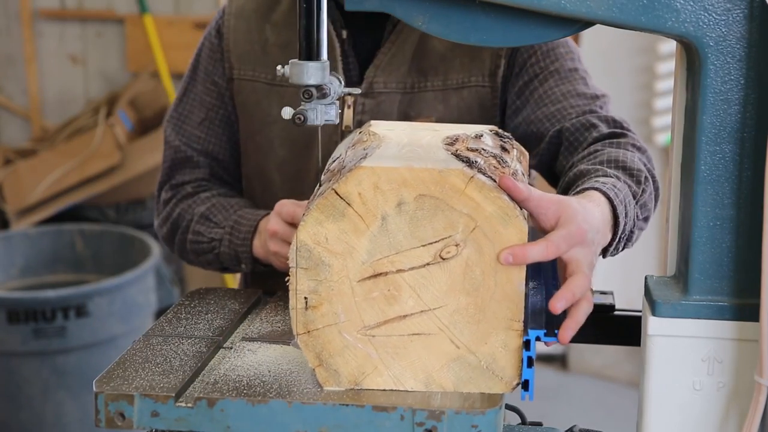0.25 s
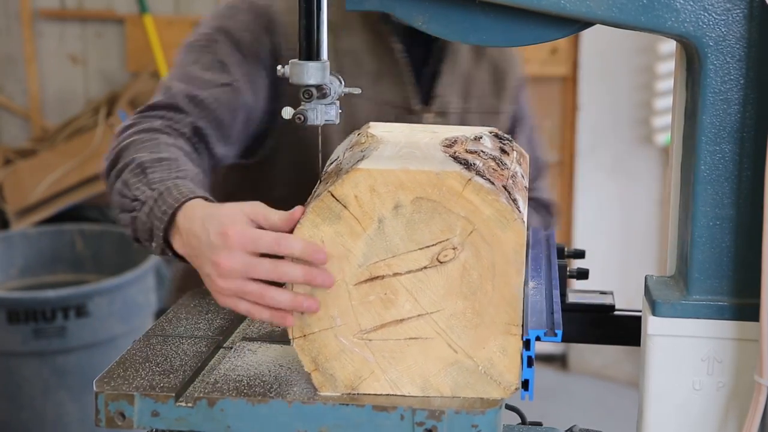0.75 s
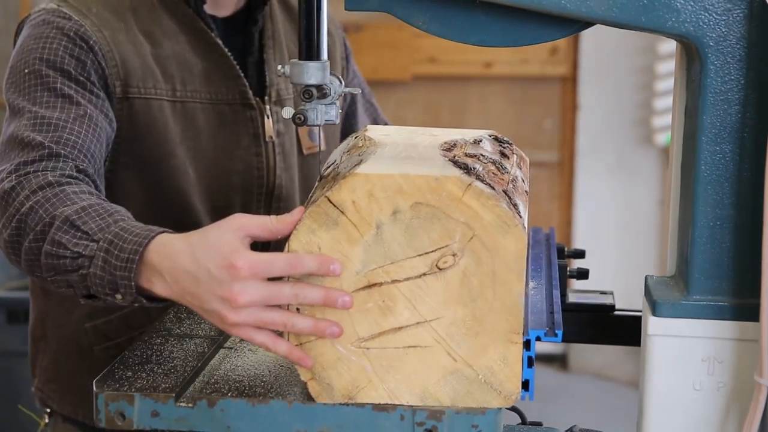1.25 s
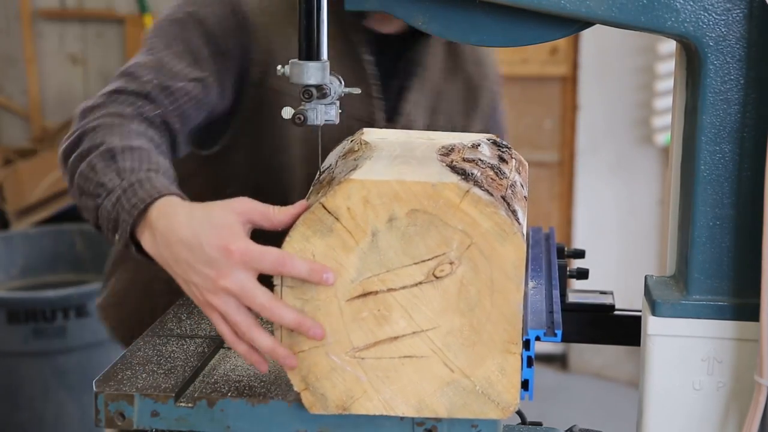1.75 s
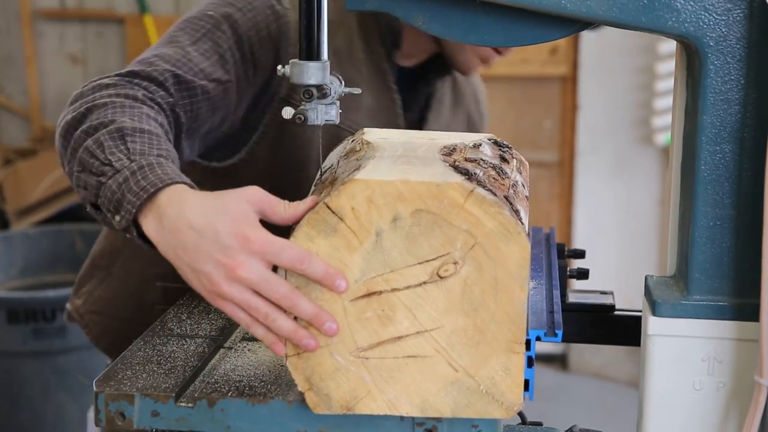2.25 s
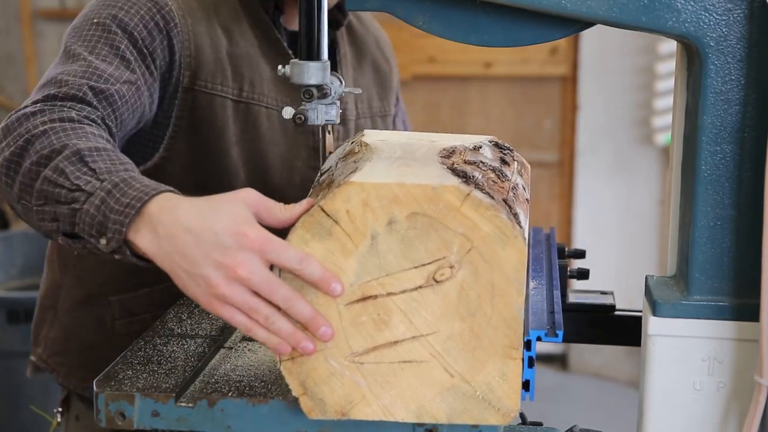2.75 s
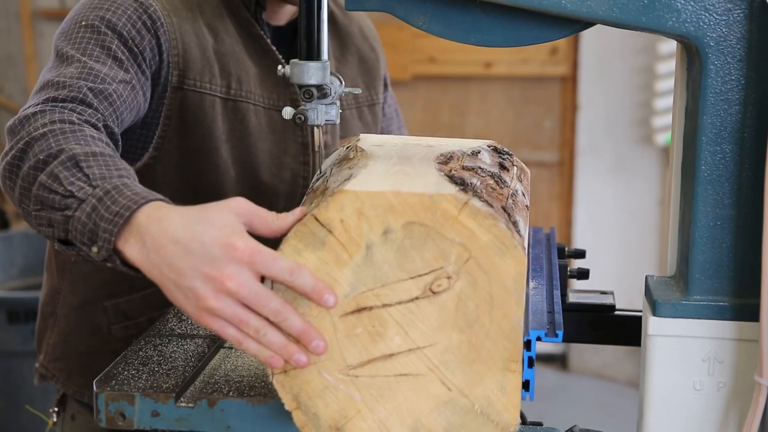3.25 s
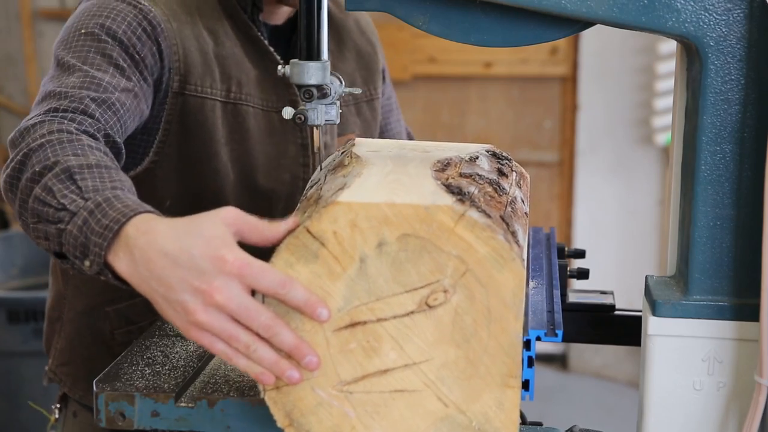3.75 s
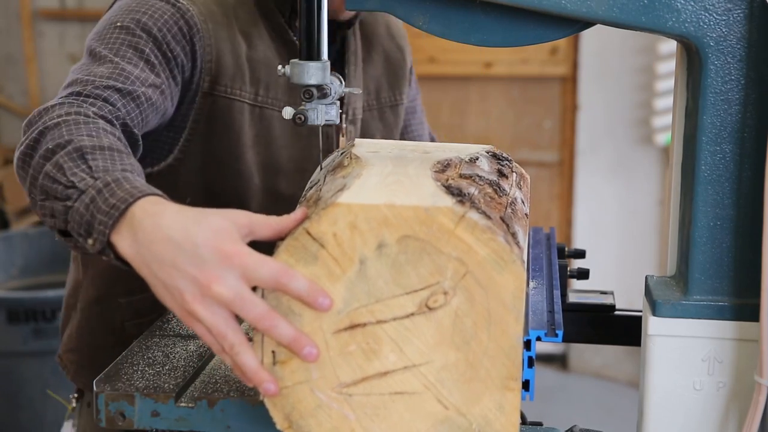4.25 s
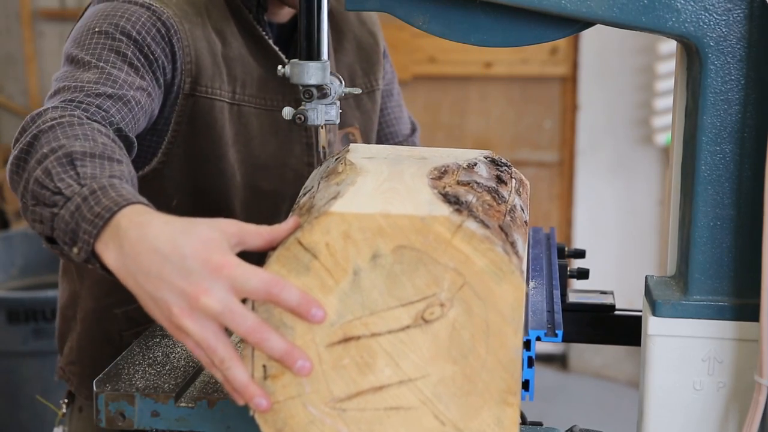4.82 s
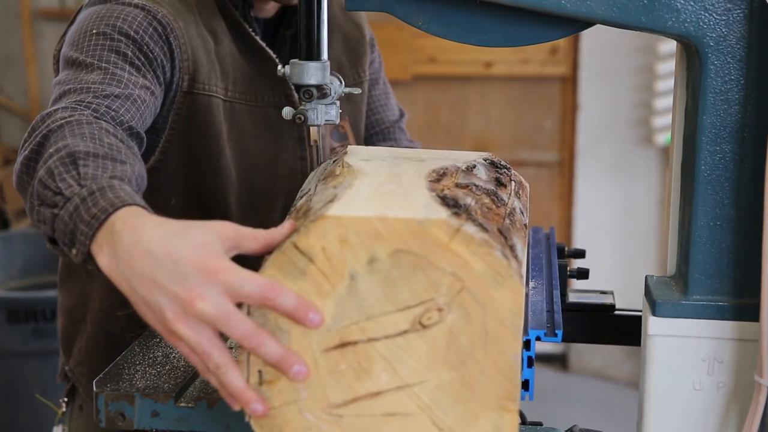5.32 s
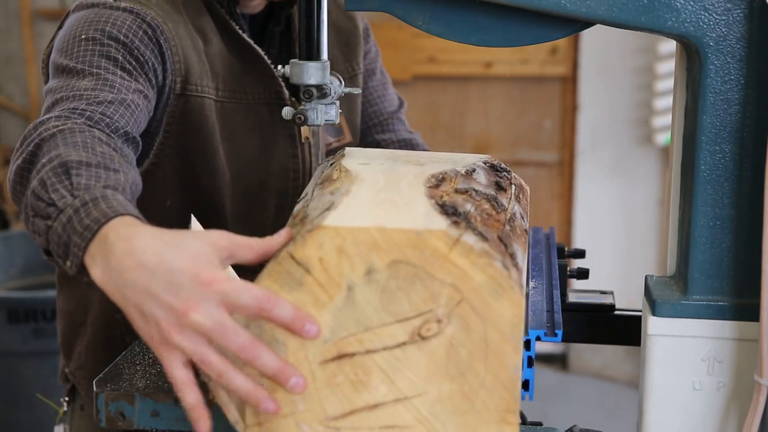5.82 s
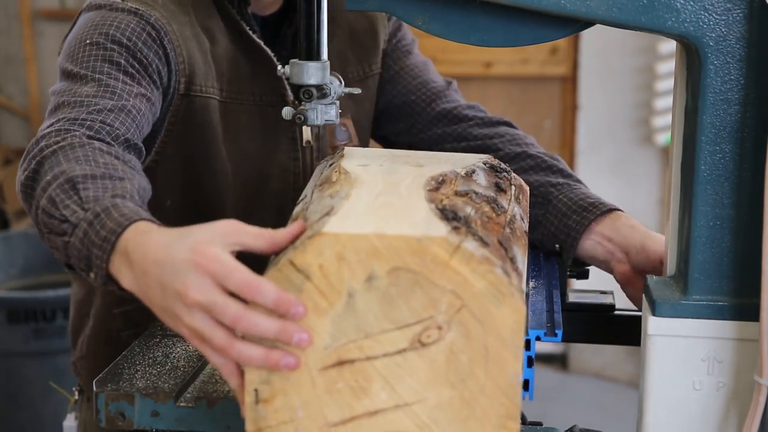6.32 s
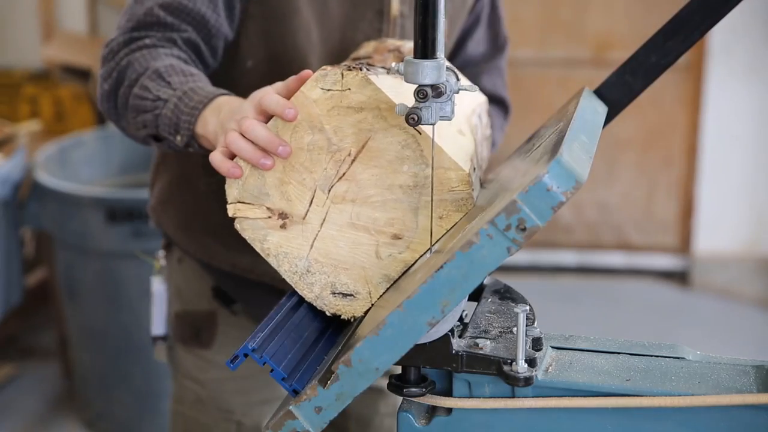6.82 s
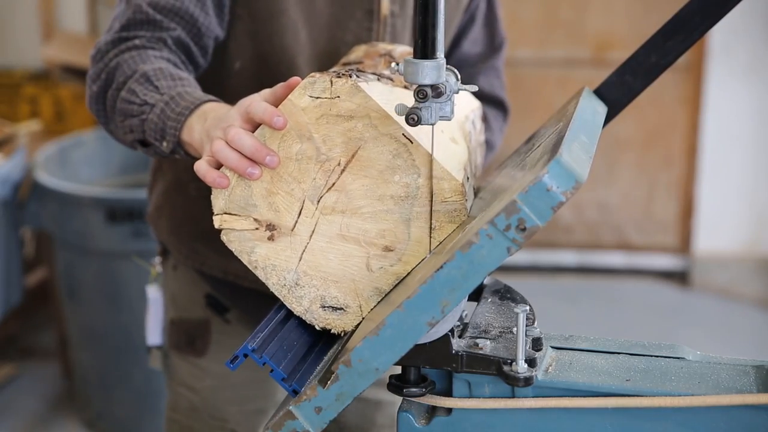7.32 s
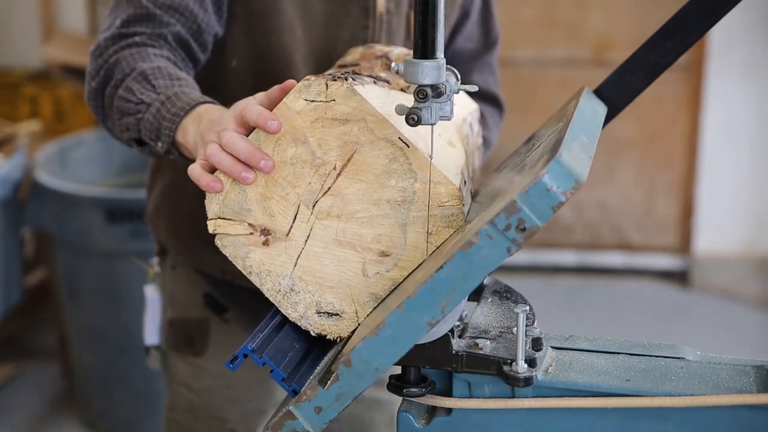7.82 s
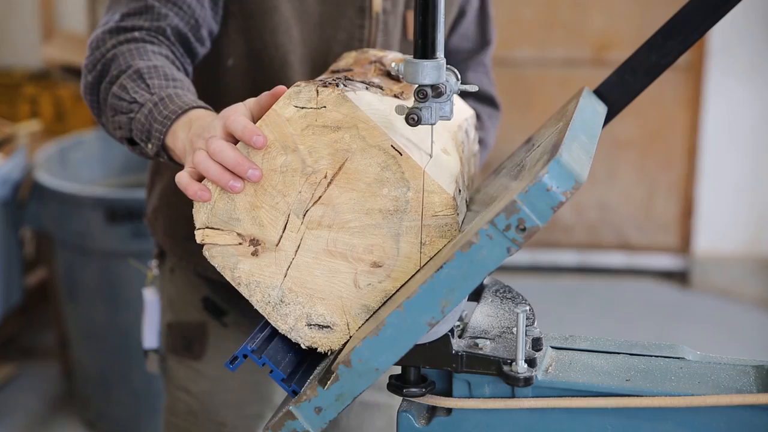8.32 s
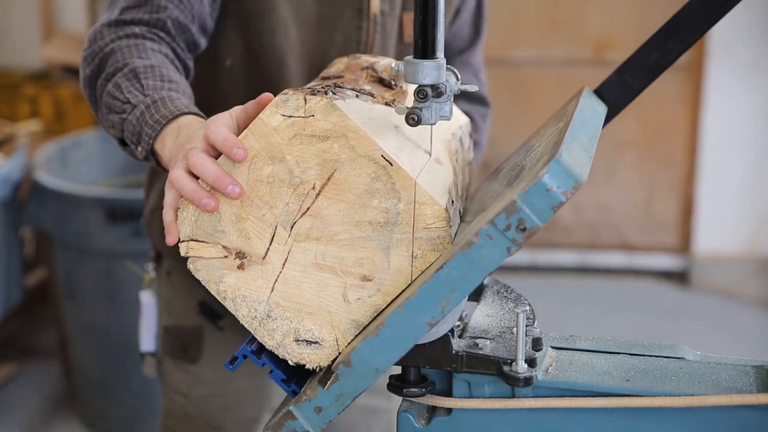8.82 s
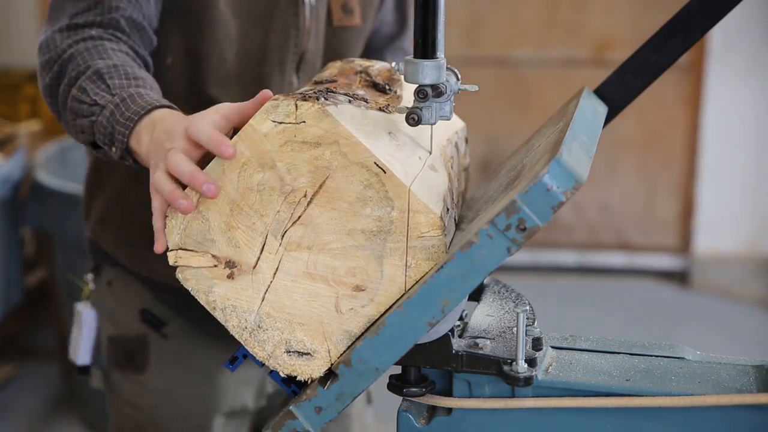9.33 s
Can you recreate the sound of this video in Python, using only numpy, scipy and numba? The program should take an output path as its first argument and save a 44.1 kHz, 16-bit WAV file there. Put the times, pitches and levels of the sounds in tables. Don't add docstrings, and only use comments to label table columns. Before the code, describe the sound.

Close mono sound of a bandsaw sawing a thick log: shrill, fluttering blade ring and bright chip hiss come in uneven pushes over motor whine, hum and broadband wheel roar. The machine seems to drop back during cuts and swells back in gaps. Midway a cut-off piece tumbles with hard wooden knocks. Then an abrupt change to a duller machine tone, a short idle, and a long, loud last cut fading to idle.

```python
import sys
import numpy as np
from scipy import signal
from scipy.fft import rfft, irfft
from scipy.io import wavfile
from scipy.ndimage import uniform_filter1d
from numba import njit

SR = 44100
rng = np.random.default_rng(int(sys.argv[2]) if len(sys.argv) > 2 else 0)


def magnitude_from_level(level_db):
    exponent = np.asarray(level_db, float) / 20
    return 10 ** exponent


def persist_wave(psi):
    counts = np.round(np.clip(psi, -1, 1) * 32767).astype(np.int16)
    wavfile.write(sys.argv[1], SR, np.atleast_2d(counts).T)


N = 422037
T = np.arange(N) / SR
MOVE_S = 6.457
TOOTH_HZ, SHAFT_HZ = 300., 18.35
WHINE_HZ, HUM_HZ = 1439.6, 479.8


# (time [s], peak [dB])
SNAGS = [(2.578, -4), (2.586, -6), (2.5924, -4.5), (2.6127, -5), (2.6597, -6), (2.6735, -14), (2.697, -16),
         (2.7227, -15), (2.7324, -17), (2.7464, -15), (2.7544, -16), (2.7674, -7), (4.068, -8),
         (4.1066, -9), (4.202, -5), (4.2157, -12), (4.2276, -9), (4.2767, -7), (4.2985, -6), (4.326, -9),
         (4.364, -10)]


def cut(speed, duck_db):
    gate, ring_db, ring_hz, kerf_db, kerf_hz, hiss_db = feed(duck_db)
    bite = tooth_bites(speed)

    blade = modes(bite * rng.standard_normal(N), BLADE_MODES, ring_hz, placed((430, 300)))
    blade = ring(blade, ring_hz, 1010)
    blade = level(ring(blade, ring_hz - 100, 1270), -0.18)
    kerf = level(modes(bite * rng.standard_normal(N), KERF_MODES, kerf_hz, 163), -0.12)
    chips = chip_hiss(bite, speed, kerf_hz)

    snags = 0
    for s, db in SNAGS:
        peak_s = s + .002
        decay_s = np.where(T < peak_s, .001, .003)
        snags = snags + magnitude_from_level(db - 6.5) * np.exp(-np.abs(T - peak_s) / decay_s)

    grab = chatter()
    tones = grab * (blade + magnitude_from_level(kerf_db) * kerf)
    sawing = gate * magnitude_from_level(ring_db) * (tones + magnitude_from_level(hiss_db) * grab ** .5 * chips)
    return sawing + snags * (blade + 0.3 * kerf + 0.28 * chips)


# (time [s], ring level [dB], ring pitch [Hz], higher in thin wood)
PUSHES = [
    [(0.0, -21, 7520), (0.256, -17.5, 7530), (0.542, -21.5, 7450)],
    [(1.034, -17.5, 7830), (1.154, -19, 7300), (1.346, -21, 7450), (1.71, -22, 7340)],
    [(2.43, -27, 8270), (2.56, -29, 7270)],
    [(2.63, -22, 7420), (2.966, -20.5, 7520), (3.278, -20, 7405), (3.835, -19.5, 7460)],
    [(4.0, -30, 8490), (4.1, -23, 7860)],
    [(4.31, -20, 7450), (4.87, -19.5, 7380), (5.139, -20.5, 7620)],
    [(5.195, -21, 7450), (5.331, -22.5, 7820), (5.62, -21.5, 7970), (5.645, -17.5, 7860), (5.77, -30, 8060)],
    [(7.17, -30.5, 8430), (7.5, -20.5, 8100), (7.87, -18.5, 7650), (8.5, -16, 7560), (9.22, -17.5, 7570)],
    [(9.29, -46, 7500), (9.57, -35, 7700)],
]
# (time [s], half length [s], kerf tone [dB], chip hiss [dB], kerf shift [Hz])
GRAIN = [
    (0.277, 0.077, -6.5, -3, 50),
    (1.624, .1, 4.5, 0, -48),
    (2.79, 0.18, -2, -5, -150),
    (3.403, 0.29, -0.5, -4.5, -52),
    (4.8, 0.2, -3.5, 2.5, 36),
    (5.35, 0.066, 0, -2, 50),
    (5.683, 0.062, -17, -3.5, -100),
    (7.5, .25, 9, 1, 22),
    (8.88, 0.038, -11, -2.5, 1),
    (9.067, .09, 4.5, 3, -180),
]


def feed(duck_db):
    enter_s, leave_s, enter_db, leave_db = 0.031, 0.062, -19, -31.5
    leave_rise_hz = 354
    ring_db = 0 * T - 90
    pitch_s, pitch_hz = [], []
    for push in PUSHES:
        s, db, hz = np.transpose(push)
        shape_s = np.r_[s[0] - enter_s, s, s[-1] + leave_s]
        shape_db = np.r_[db[0] + enter_db, db, db[-1] + leave_db]
        ring_db = np.maximum(ring_db, np.interp(T, shape_s, shape_db, -90, -90))
        pitch_s.extend([*s, s[-1] + leave_s / 2])
        pitch_hz.extend([*hz, hz[-1] + leave_rise_hz])
    ring_hz = np.interp(T, pitch_s, pitch_hz)
    gate = uniform_filter1d(1. * (ring_db > -90), size=400)

    over_db = np.maximum(ring_db, -50) + 20
    kerf_db = placed((-9, -15.5)) - 0.65 * over_db + 1.5 * walk(5)
    kerf_hz = placed((3633, 4128)) + placed((0.97, 0.036)) * (ring_hz - 7400)
    hiss_db = placed((-10, 1)) - 0.72 * over_db + placed((0.11, 0.61)) * duck_db

    grain = np.array(GRAIN)
    kerf_db = kerf_db + bumps(grain[:, [0, 1, 2]])
    hiss_db = hiss_db + bumps(grain[:, [0, 1, 3]])
    kerf_hz = kerf_hz + bumps(grain[:, [0, 1, 4]])
    return gate, over_db - 19.5, ring_hz, kerf_db, kerf_hz, hiss_db


def tooth_bites(speed):
    teeth = np.cumsum(TOOTH_HZ * speed) / SR
    sizes = magnitude_from_level(1.1 * np.clip(rng.standard_normal(N // 100), -3, 1.8))
    size = sizes[teeth.astype(int)]
    bursts = size * (0.6 + np.exp(-(teeth % 1) / 0.44))
    stutter_db = 0.5 * walk(45) + 0.18 * walk(15)
    return uniform_filter1d(bursts, size=24) * magnitude_from_level(stutter_db)


# (centre [Hz], width [Hz], level [dB])
BLADE_MODES = [(6890, 210, 5.5), (7195, 70, 2.5), (7440, 170, -8), (7535, 97, -2), (7737, 77, 4),
               (7830, 23, -1.5), (8126, 99, 0), (8500, 270, 5), (8350, 250, -5)]
# (centre [Hz], width [Hz], level [dB])
KERF_MODES = [(3480, 180, -15), (3520, 70, 3.5), (3660, 170, -14), (3780, 18, 0), (3963, 170, 6),
              (4143, 34, -1), (4470, 20, 11)]


def modes(scrape, group, centre_hz, reach_hz):
    out = 0
    for hz, width, db in group:
        near = np.exp(-.5 * ((hz - centre_hz) / reach_hz) ** 2)
        out = out + near * magnitude_from_level(1.2 * walk(36)) * level(ring(scrape, hz, width), db)
    return out


# (frequency [Hz], density [dB per Hz])
CHIP_COLOUR = [
    [(1200, -28.5), (2600, -1.5), (3700, 1.5), (5600, -5), (7300, 5), (8800, -8.5), (10500, 4),
     (13000, 0.5), (15600, 2)],
    [(1200, -34), (2700, -27), (4200, -0.5), (6000, -3.5), (7700, 6.5), (9300, -3.5), (11600, 4),
     (13600, 3.5), (14800, 0), (15600, 3.5)],
]
# (centre [Hz], width [Hz], level [dB])
CHIP_MODES = [
    [(11400, 100, -20)],
    [(2700, 200, -18), (4500, 60, -14), (5130, 120, -16), (12900, 100, -17)],
]


def chip_hiss(bite, speed, kerf_hz):
    hiss = []
    for colour, patches in zip(CHIP_COLOUR, CHIP_MODES):
        chips = level(bite ** 1.15 * coloured(colour), 3.8)
        for hz, width, db in patches:
            patch = level(ring(bite * rng.standard_normal(N), hz, width), db)
            chips = chips + magnitude_from_level(3 * walk(25)) * patch
        hiss.append(chips)

    squeal_db = bumps([(5.72, .07, 9)])
    bearing = ring(rng.standard_normal(N), 13050 * speed - 30 * squeal_db, 120)
    hiss[0] += magnitude_from_level(4 * walk(20) + squeal_db) * level(bearing, -10)
    cry = level(ring(rng.standard_normal(N), 12300, 600), -0.88)
    hiss[0] += (magnitude_from_level(squeal_db) - 1) * magnitude_from_level(3.2 * walk(30)) * cry

    third_hz = 2.92 * np.minimum(uniform_filter1d(kerf_hz, SR // 5), 3680)
    third = level(ring(bite * rng.standard_normal(N), third_hz, 330), -6)
    hiss[0] += magnitude_from_level(4 * walk(40)) * third
    return placed(hiss)


def chatter():
    rate_hz, jitter, swell_s = 72, .3, .0019
    gap, size = rng.standard_normal((int(2 * rate_hz * N / SR), 2)).T
    at = (np.cumsum(np.exp(jitter * gap)) / rate_hz * SR).astype(int)
    inside = at < N
    grabs = np.bincount(at[inside], magnitude_from_level(2.5 * np.clip(size, -3, 1.1))[inside], N)
    bell = np.exp(-.5 * ((T[:800] - T[400]) / swell_s) ** 2)
    swell = signal.fftconvolve(grabs, bell, "same")
    return level(1 + placed((.85, .45)) * swell, 0)


# (time [s], peak [dB], pitch [Hz])
KNOCKS = [
    (2.579, -10, 958),
    (5.966, -10, 2500),
    (5.999, -10, 974),
    (6.039, -8, 937),
    (6.078, -11, 1040),
    (6.0965, -3, 1030),
    (6.1355, -4, 842),
    (6.233, -12, 3000),
]


def knocks():
    out = np.zeros(N)
    t = T[:SR // 8]
    for s, db, hz in KNOCKS:
        decay = .6 * np.exp(-t / .0012) + .2 * np.exp(-t / .008)
        crack = rng.standard_normal(len(t)) * decay - 2.2 * np.exp(-t / .00006)
        dull = .22 * np.sin(2 * np.pi * hz * t) * np.exp(-t / .008)
        i = int(s * SR)
        out[i:i + len(t)] += magnitude_from_level(db - 1.5) * (crack + dull)
    wood = ring(ring(out, 2200, 7000), 2200, 7000)
    puff_s, puff_length_s, puff_db = 6.745, 0.0062, -19.5
    puff = ring(rng.standard_normal(N), 6000, 9000) * np.exp(-.5 * ((T - puff_s) / puff_length_s) ** 2)
    return wood + magnitude_from_level(puff_db) * puff


# (time [s], half length [s], gain on the roar's bass [dB])
SLIDE = [
    (6.09, 0.053, 7.5),
]


def roar(speed, duck_db):
    slide_db = bumps(SLIDE)
    roar_db = placed((-34.5, -35)) + duck_db + slide_db
    treble_db = placed((3, 2)) + placed((-0.0051, -0.14)) * duck_db - slide_db
    return magnitude_from_level(roar_db) * placed([machine(place, speed, treble_db) for place in (0, 1)])


# (frequency [Hz], density [dB per Hz])
ROAR_COLOUR = [
    [(30, -60), (180, -37), (260, -23), (400, -33), (450, -5.5), (600, -11), (700, -4.5), (1100, -5.5),
     (1500, -4.5), (2250, -9.5), (3000, -7), (4400, -6.5), (9000, -9.5), (15600, -7)],
    [(30, -60), (170, -62), (230, -20), (400, -23), (460, -0.5), (600, -22), (900, -12), (1400, -7.5),
     (1800, -8.5), (2800, -10), (6000, -20.5), (9200, -23), (15600, -24)],
]
# (centre [Hz], width [Hz], level [dB])
HOUSING = [
    [(3065, 120, 4), (4350, 75, -1), (2600, 150, -7), (13100, 300, -4), (6700, 100, -13)],
    [(220, 20, -22), (440, 40, -13), (1530, 120, -3), (7650, 260, -3)],
]
# (frequency [Hz], level over the roar [dB])
MOTOR_LINES = [
    [(220, -27), (290, -27), (432, -22), (1676, -13), (1920, -9), (3359, -15)],
    [(220, -16), (290, -24), (646, -16), (1200, -15), (1320, -14), (1679, -5), (1990, -4), (2223, -12),
     (2760, -10), (5270, -18), (11208, -19)],
]


def machine(place, speed, treble_db):
    noise = coloured(ROAR_COLOUR[place])
    noise /= np.std(ring(ring(noise, 960, 1090), 960, 1090))
    bass = signal.sosfilt(signal.butter(2, 2200, fs=SR, output="sos"), noise)
    treble = magnitude_from_level(0.48 * walk(15)) * (noise - bass)

    rings = 0
    for hz, width, db in HOUSING[place]:
        rings = rings + magnitude_from_level(2 * walk(25)) * level(ring(rng.standard_normal(N), hz, width), db)
    lines = magnitude_from_level(2) * sum(magnitude_from_level(db) * tone(hz, 2.5) for hz, db in MOTOR_LINES[place])

    if place == 0:
        belt = uniform_filter1d(speed, SR // 4, origin=SR // 9)
        howl_hz = 714 * (1 - 2.2 * (1 - belt))
        bass = bass + level(ring(rng.standard_normal(N), howl_hz, 10), -6)
    else:
        rings = rings + magnitude_from_level(5 * walk(14)) * level(ring(rng.standard_normal(N), 13010, 110), -8)
    return bass + magnitude_from_level(treble_db) * (treble + rings) + lines


# (turns off the line, level under it [dB])
SIDEBANDS = [
    [(-2, -21), (-1, -18), (1, -21), (2, -18)],
    [(-2, -25), (-1, -15), (1, -26), (3, -16), (4, -19), (5, -24)],
]
# (multiple, level under the line [dB])
OVERTONES = [(2, -20), (3, -17), (4, -18), (5, -16), (6, -18)]
# (time [s], half length [s], level [dB])
WHINE_FADES = [
    (2.12, 0.038, -4),
    (5.9, 0.038, -7),
    (6.0, 0.03, -6),
    (6.15, 0.17, -4.5),
    (6.31, .03, -10),
    (6.41, 0.057, -6),
]


def whine(speed, duck_db):
    mains_db = placed((-22.5, -18)) + placed((0.9, 0.79)) * duck_db
    load = np.clip((1 - speed) / .022, 0, 1)
    rotor_db = mains_db + placed((-13, -24)) + placed((9, 0)) * load
    fade_db = placed((bumps(WHINE_FADES), 0))

    bands = []
    for sidebands in SIDEBANDS:
        bands.append(sum(magnitude_from_level(db) * tone(WHINE_HZ + k * SHAFT_HZ, 2.5) for k, db in sidebands))
    overtones = sum(magnitude_from_level(db) * tone(k * WHINE_HZ, 1.7) for k, db in OVERTONES)
    mains = tone(WHINE_HZ, 0.46) + magnitude_from_level(-25.5) * tone(2 * HUM_HZ, 2.3)
    mains = mains + placed((bands[0] + overtones, bands[1]))
    rotor = tone(WHINE_HZ - TOOTH_HZ * (1 - speed), 1.0)
    return magnitude_from_level(mains_db + fade_db) * mains + magnitude_from_level(rotor_db + fade_db) * rotor


# (time [s], half length [s], level [dB])
HUM_FADES = [
    (.62, 0.087, 3),
    (1.3, 0.57, 5.5),
    (1.69, 0.098, -18),
    (3.75, 0.19, 7.5),
    (4.05, 0.091, -24),
    (4.6, .3, 6),
    (5.35, .15, -7),
    (5.72, 0.063, -24),
    (6.11, 0.036, -6),
    (6.44, 0.017, -18),
]


def hum(duck_db):
    hum_db = placed((-34.5, -25.5)) + placed((0.98, 1.27)) * duck_db
    return magnitude_from_level(hum_db + placed((bumps(HUM_FADES), 0))) * tone(HUM_HZ, 0.34)


# (frequency [Hz], density [dB per Hz])
ROOM_COLOUR = [(25, -20), (100, -13.5), (220, -3.5), (350, -1), (600, -19.5)]


def room():
    return magnitude_from_level(4.0 * walk(9.0)) * level(coloured(ROOM_COLOUR), -62)


# (time [s], share of free running [0-1])
SPEED = [(0, .96), (.5, .937), (.8, .997), (1.02, .997), (1.2, .947), (1.65, .957), (1.95, .993),
         (2.575, 1.), (3., .958), (3.8, .943), (4.2, .993), (4.5, .932), (4.88, .919), (5.12, .95),
         (5.65, .964), (6., .997), (7.5, .996), (9.2, .975)]


def wheel_speed():
    return np.interp(T, *np.transpose(SPEED))


# (start [s], end [s], early depth [dB], late depth [dB], grab time [s])
DUCKS = [
    (0, 0.564, 14, 21, 0.00086),
    (1.012, 1.68, 14, 17.5, 0.03),
    (2.42, 2.586, 5, 4, .05),
    (2.569, 3.838, 16.5, 16, 0.09),
    (4.208, 5.81, 22.5, 5.5, 0.11),
    (7.107, 9.31, 20.5, 23, 0.48),
]


def ducking():
    goal, lag_s = 0 * T, 0.13 + 0 * T
    for start, end, early_db, late_db, grab_s in DUCKS:
        on = (T >= start) & (T < end)
        goal = np.where(on, -np.interp(T, [start, end], [early_db, late_db]), goal)
        lag_s = np.where(on, grab_s, lag_s)
    return chase(goal, np.minimum(1 / (lag_s * SR), 1))


@njit
def chase(goal, share):
    y, v = np.empty(len(goal)), goal[0]
    for i in range(len(goal)):
        v += share[i] * (goal[i] - v)
        y[i] = v
    return y


@njit
def svf(x, hz, width):
    y, band, low = np.empty(len(x)), 0., 0.
    for i in range(len(x)):
        g, k = np.tan(np.pi * hz[i] / SR), width / hz[i]
        v = (band + g * (x[i] - low)) / (1 + g * (g + k))
        band, low, y[i] = 2 * v - band, low + 2 * g * v, k * v
    return y


def ring(x, hz, width):
    return svf(x, np.clip(hz + 0 * T, 20, .45 * SR), 1. * width)


def walk(rate):
    k = int(SR / rate)
    held = np.repeat(rng.standard_normal(N // k + 1), k)
    return 1.25 * uniform_filter1d(uniform_filter1d(held, k), k)[:N]


def coloured(points):
    hz, db = np.transpose(points)
    f = np.maximum(np.arange(N // 2 + 1) * SR / N, 1)
    gain = magnitude_from_level(np.interp(np.log(f), np.log(hz), db))
    return irfft(rfft(rng.standard_normal(N)) * gain, N)


def tone(hz, wobble_db):
    phase = np.cumsum(hz + 0 * T) / SR + rng.random()
    return np.sqrt(2) * magnitude_from_level(wobble_db * walk(7.2)) * np.sin(2 * np.pi * phase)


def level(x, db):
    return x * magnitude_from_level(db) / np.sqrt(np.mean(x ** 2))


def bumps(rows):
    return sum(height * np.exp(-.5 * ((T - s) / half) ** 2) for s, half, height in rows)


def placed(pair):
    return np.where(T > MOVE_S, pair[1], pair[0])


def scene():
    speed, duck_db = wheel_speed(), ducking()
    pump = magnitude_from_level(0.15 * walk(10))
    mono = pump * (cut(speed, duck_db) + roar(speed, duck_db))
    mono = mono + knocks() + whine(speed, duck_db) + hum(duck_db) + room()
    return np.array([mono, mono])


def low_pass(x):
    return signal.sosfilt(signal.butter(12, 15730, fs=SR, output="sos"), x)


def record(dry):
    ceiling = 1.1
    rounded = ceiling * np.tanh(1.077 * dry / ceiling)
    rumble_cut = signal.butter(2, 40, "high", fs=SR, output="sos")
    return low_pass(signal.sosfilt(rumble_cut, rounded))


dry = scene()
out = record(dry)
persist_wave(out)
```